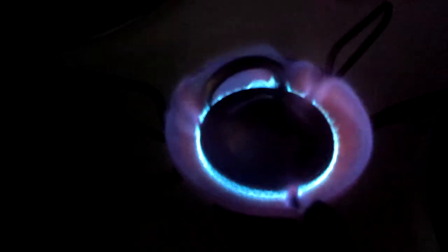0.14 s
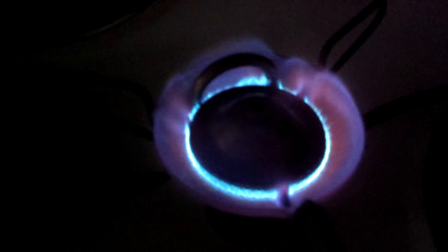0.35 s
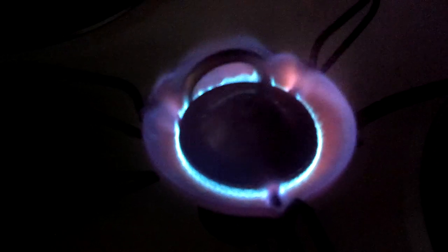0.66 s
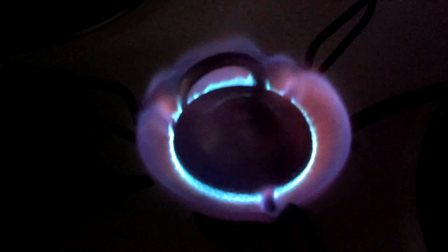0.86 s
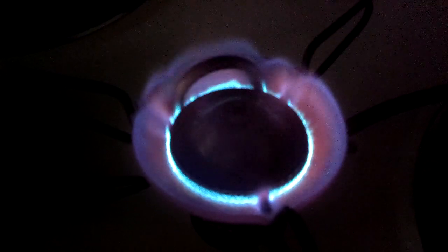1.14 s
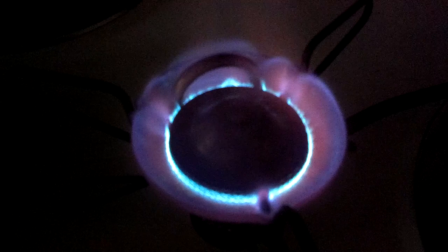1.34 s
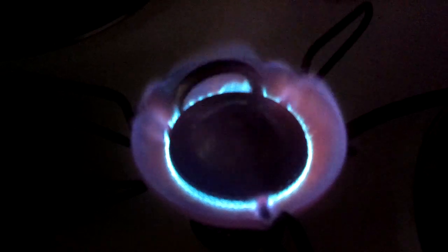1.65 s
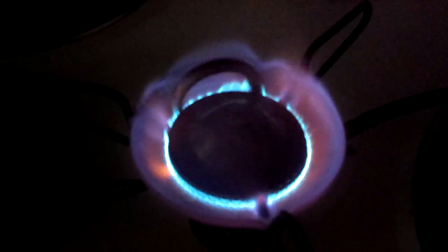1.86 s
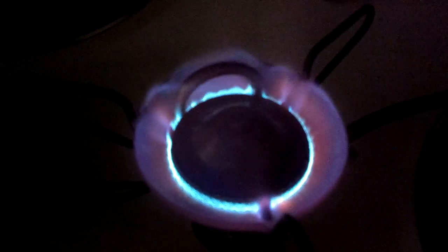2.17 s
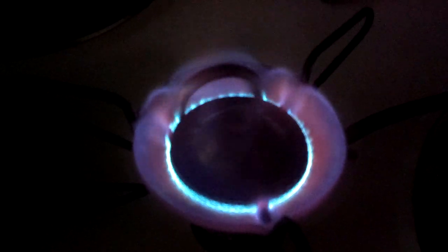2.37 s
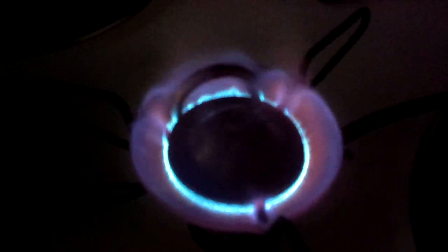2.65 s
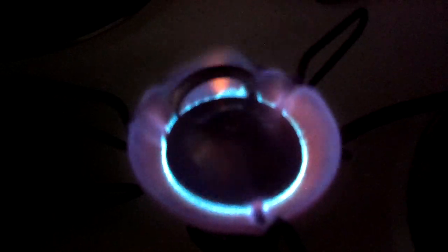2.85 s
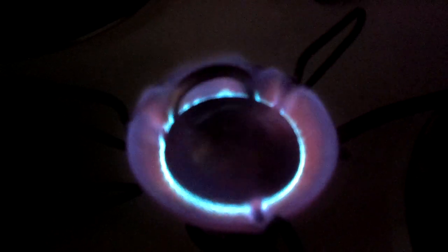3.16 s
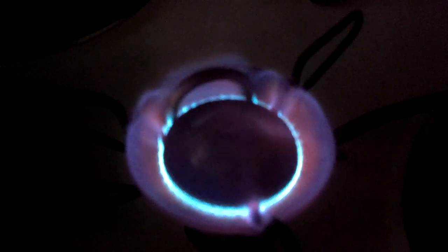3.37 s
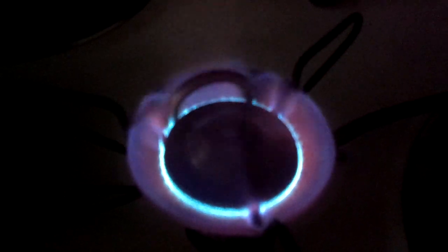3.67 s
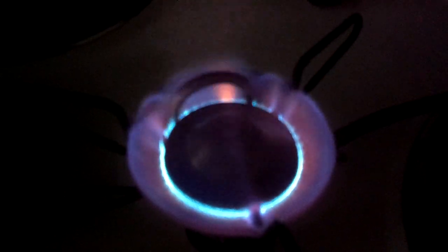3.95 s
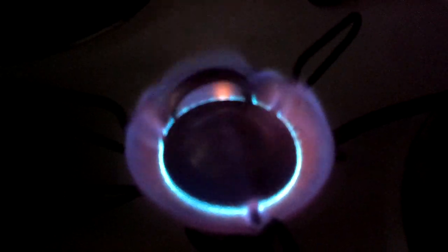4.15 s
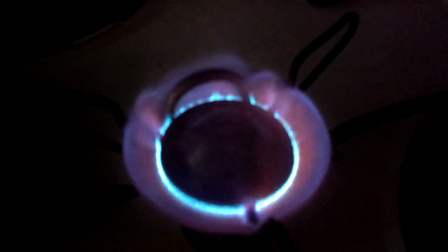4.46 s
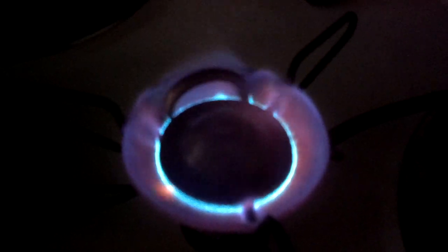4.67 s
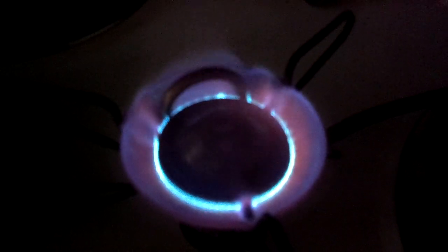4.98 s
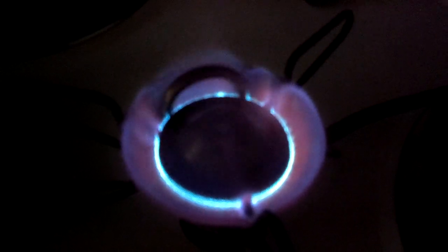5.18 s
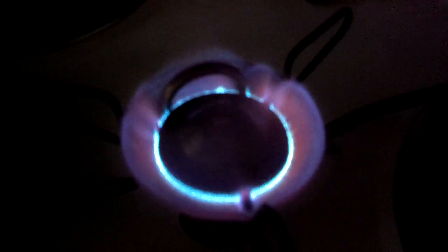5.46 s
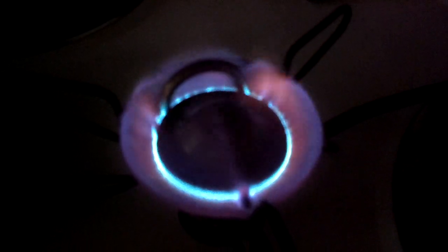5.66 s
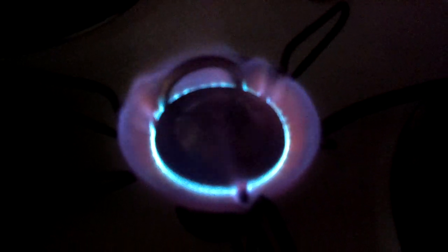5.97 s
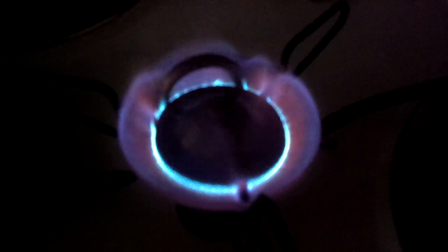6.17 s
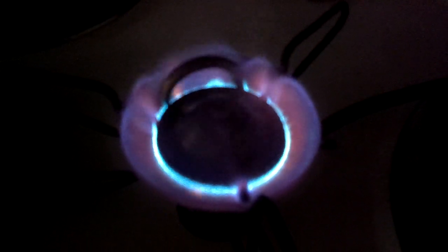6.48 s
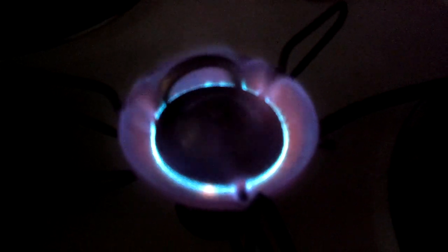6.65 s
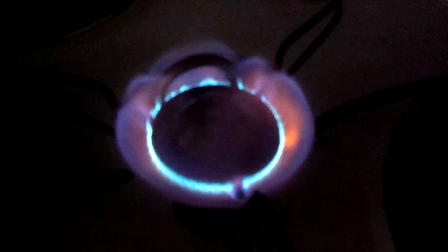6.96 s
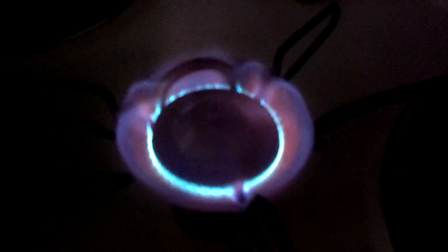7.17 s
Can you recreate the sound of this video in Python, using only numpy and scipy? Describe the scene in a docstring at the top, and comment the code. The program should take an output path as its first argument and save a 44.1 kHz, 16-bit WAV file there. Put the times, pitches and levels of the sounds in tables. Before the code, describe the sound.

A small liquid-fuel camping stove burns close to the microphone in a kitchen. Fuel vapour rushes from the jet with a bright hiss that sputters in quick, uneven spurts, several each second. A thin, high whistle rings within the hiss, and the flame roars low underneath. The burning continues at much the same level throughout, and one short, dull knock comes near the end.

```python
"""A bright hiss, coming in quick spurts: a small liquid-fuel stove burns close by in a kitchen.
Fuel vapour rushes from the jet and rings in the burner, which adds a whistle. Under it the ring of
flame roars low, and one dull knock comes near the end. The right channel hears the hiss upside down
and a little late, so left and right agree at some pitches and oppose each other at others."""
import sys
import numpy as np
from scipy import signal
from scipy.fft import rfft, irfft, next_fast_len
from scipy.io import wavfile
from scipy.ndimage import uniform_filter1d, map_coordinates

SR = 44100
rng = np.random.default_rng(int(sys.argv[2]) if len(sys.argv) > 2 else 0)


def generate_wav(sig):
    """Save sig (samples, or channels by samples) to the path in sys.argv[1] as 16-bit PCM at SR."""
    pcm = np.round(np.clip(np.atleast_2d(sig).T, -1, 1) * 32767).astype(np.int16)
    wavfile.write(sys.argv[1], SR, pcm)


N = 322812
TIME = np.arange(N) / SR


# The left side hears the whistle and the lowest hiss a little louder.
# Each row: pitch in Hz, left over right in dB.
HISS_BALANCE = [(700, 1.5), (1050, 0), (5700, -0.12), (6150, 2), (6700, -0.27)]

def hiss(events):
    """Vapour rushes from the jet as noise, swells with each spurt and rings in the burner."""
    noise = turbulence(lambda hz, s: hiss_swell_db(events, hz, s), patchy_db=1.19, bins=5, frames=8)
    jet = stereo(noise, hiss_colour, curve(HISS_BALANCE), hiss_lead, hiss_likeness)
    return amp(slow_burn_db("hiss", TIME)) * jet


# Clear spurts of boiling fuel. Each row: time of the peak in seconds, rise in dB, length in ms.
CLEAR_SPURTS = [(0.005, 5.5, 60), (0.1, 3.5, 40), (0.205, 4, 30), (0.304, 6, 26), (0.35, 3.5, 22),
                (0.419, 6.5, 24), (0.47, 2, 22), (0.522, 8, 34), (0.659, 6.5, 42), (0.784, 5, 36),
                (0.897, 6.5, 52), (0.978, 5.5, 32), (1.06, 6.5, 32), (1.137, 8.5, 41), (1.228, 6, 44),
                (1.37, 6.5, 120), (1.495, 7.5, 50), (1.616, 7.5, 20), (1.663, 6, 53), (1.8, 5.5, 26),
                (1.897, 5.5, 43), (2.0, 6, 28), (2.103, 5.5, 36), (2.268, 6.5, 46), (2.403, 5.5, 33),
                (2.546, 6, 62), (2.659, 7, 44), (2.85, 6, 50), (2.97, 3, 45), (3.123, 5, 40),
                (3.273, 5.5, 34), (3.362, 6.5, 49), (3.505, 6, 68), (3.667, 6, 32), (3.729, 5, 47),
                (3.851, 4, 44), (4.001, 6, 40), (4.103, 3.5, 22), (4.175, 5, 50), (4.28, 5, 45),
                (4.06, 3.5, 24), (4.315, 3, 22), (4.355, 3, 18), (4.392, 5, 22), (4.44, 3, 30),
                (4.51, 4, 26), (4.55, 4, 24), (4.587, 6.5, 30), (4.652, 5, 18), (4.719, 4, 28),
                (4.805, 4, 42), (4.874, 5, 30), (4.974, 6, 30), (5.05, 2.5, 30), (5.152, 4, 67),
                (5.225, 2.5, 45), (5.322, 7.5, 29), (5.438, 4, 30), (5.513, 4.5, 44), (5.583, 4, 28),
                (5.735, 4.5, 43), (5.842, 6, 50), (5.962, 10, 20), (6.062, 6.5, 35), (6.165, 4.5, 49),
                (6.235, 3.5, 30), (6.297, 8, 36), (6.359, 6.5, 26), (6.427, 6, 54), (6.524, 5.5, 39),
                (6.612, 6.5, 72), (6.745, 6, 59), (6.869, 7, 31), (7.013, 7.5, 34), (7.229, 4.5, 40),
                (7.285, 4, 40)]

def spurts():
    """Fuel boils at the jet: clear spurts, with small random ones in the pauses."""
    per_second, mean_db, spread_db, length_ms = 18, 3, 1.5, 18  # the small spurts
    calm_s = 0.053  # they fade away this near a clear spurt
    jitter, size = rng.random((int(per_second * N / SR), 2)).T
    at = (np.arange(len(jitter)) + jitter) / per_second
    clear = np.array(CLEAR_SPURTS)
    nearest_s = np.min(abs(at[:, None] - clear[:, 0]), axis=1)
    rise_db = (mean_db + spread_db * (2 * size - 1)) * (1 - np.exp(-(nearest_s / calm_s) ** 4))
    small = [at, rise_db, np.full(len(at), length_ms)]
    return np.hstack([clear.T, small])[:, :, None]


def surge_db(events, s):
    """The rise of all spurts added up at times s; each rises faster than it falls."""
    at, rise_db, length_ms = events
    half_lengths = 2000 * (s - at) / length_ms
    steepness = np.where(s < at, 1.16, 0.84)
    return np.sum(rise_db * 0.5 ** (steepness * half_lengths) ** 2, axis=0)


# How spurts lift the hiss. Each row: pitch in Hz, share of the spurt's rise.
SPURT_SHARE = [(500, 0.12), (1500, 0.31), (4000, 0.36), (6200, 0.44), (9000, 0.99), (15000, 0.95)]
# The high sheen of the hiss softens midway. Each row: time in seconds, level over the hiss in dB.
SHEEN_LEVELS = [(0, 1.5), (1.5, 0.8), (2.5, 0), (3.5, -1.6), (4.7, -1.6), (5.6, 0.3), (6.3, 0.5),
                (7.32, -0.5)]

def hiss_swell_db(events, hz, s):
    """Spurts lift the treble most, while the whistle and the sheen drift on their own."""
    whistle_db = bell(hz, centre_hz=6300, width_hz=1400) * slow_burn_db("whistle", s)
    sheen_db = bell(hz, centre_hz=9700, width_hz=2000) * np.interp(s, *zip(*SHEEN_LEVELS))
    return curve(SPURT_SHARE)(hz) * surge_db(events, s) + whistle_db + sheen_db


# The jet's own noise. Each row: pitch in Hz, relative level in dB.
JET_LEVELS = [(650, -3.5), (1100, -4), (1600, -5.5), (2500, -2.5), (3900, 0.0), (5300, -5.5), (7400, -10.5),
              (9200, -7), (10800, -9.5), (12500, -4), (14200, -9), (15700, -3.5)]
# Where the burner's cup and tube ring. Each row: pitch in Hz, width in Hz, level over the jet in dB.
BURNER_RINGS = [(980, 140, 2.9), (1190, 130, 1.9), (1990, 320, 4.0), (2240, 140, 4.2), (2480, 280, 4),
                (2640, 100, 4.9), (3020, 500, 6.6), (3310, 90, 7.5), (3520, 230, 8.5), (3670, 90, 5),
                (3790, 50, 0), (3950, 150, 0), (4065, 35, 1), (4250, 130, 3.1), (4430, 100, 6.3),
                (4600, 180, 7.7), (4830, 350, 4.1), (5080, 150, 4.2), (5240, 80, 3.3), (5710, 230, 11.9),
                (5910, 100, 10.8), (6160, 300, 19.9), (6320, 90, 15), (6480, 130, 11.2), (6750, 650, 9.3),
                (8460, 120, 2), (8630, 840, 8.8), (8690, 200, 5), (9550, 250, 5.4), (10110, 940, 2.1),
                (10530, 70, 3.9), (11140, 230, 5.5), (14730, 630, 4.9), (15360, 450, 1.5)]
# Where close reflections cancel the jet. Each row: pitch in Hz, width in Hz, depth in dB.
REFLECTION_DIPS = [(1095, 90, 2), (1780, 60, 3.5), (2126, 150, 2), (2340, 50, 2.5), (2420, 49, 2.5),
                   (3225, 40, 2), (3755, 40, 3), (4350, 40, 5), (4500, 40, 1.5), (4730, 60, 3),
                   (4975, 70, 2.5), (5180, 60, 4), (5380, 70, 2.5), (5810, 40, 2.5), (5970, 35, 3),
                   (6395, 55, 4), (7360, 60, 1.5), (9100, 80, 2.5), (9300, 60, 3), (9720, 50, 3),
                   (9905, 50, 3), (10800, 250, 3.5), (11540, 60, 4), (12500, 80, 3), (12430, 90, 2.5),
                   (12900, 250, 1.5), (2765, 130, 3.5)]

def hiss_colour(hz):
    """How strong each pitch is: the burner adds peaks to the jet, and reflections cut dips."""
    def peak(centre_hz, width_hz):
        return 1 / (1 + (2 * (hz - centre_hz) / width_hz) ** 2) ** 2

    ring_power = sum(amp(db) ** 2 * peak(pitch, width) for pitch, width, db in BURNER_RINGS)
    dips_db = sum(db * peak(pitch, width) for pitch, width, db in REFLECTION_DIPS)
    jet_db = curve([(300, -30), *JET_LEVELS])(hz)  # very little bass
    return amp(jet_db - dips_db) * np.sqrt(1 + ring_power)


# Bands where left and right agree, then oppose, in turn.
# Each row: low edge in Hz, high edge in Hz, likeness from 0 to 1 in the gap above the band.
STEREO_BANDS = [(1010, 1720, .42), (2412, 2933, 0.68), (3975, 4680, 0.43), (5230, 5580, 0.64),
                (6740, 7530, .2), (7647, 8323, 0.74), (9630, 9890, 0.3), (10770, 11480, .45),
                (12120, 12800, .35), (13350, 14000, .35), (14700, 16000, 1)]

def hiss_lead(hz):
    """The right wave's lead in radians: it starts upside down and slips half a turn per band."""
    edges_hz = np.array(STEREO_BANDS)[:, :2].ravel()
    half_turns = np.repeat(np.arange(len(STEREO_BANDS)), 2)
    return -np.pi * np.interp(hz, [0, *edges_hz], [-1, *half_turns])


def hiss_likeness(hz):
    """Left and right are less alike between the bands, most of all beside a band that agrees."""
    _, high_hz, gap_likeness = np.transpose(STEREO_BANDS)
    gap = np.maximum(np.searchsorted(high_hz, hz) - 1, 0)
    lead = hiss_lead(hz)
    looseness = np.minimum(1, 2 * abs(np.sin(lead))) * abs(np.cos(lead / 2))
    return 1 - (1 - gap_likeness[gap]) * looseness


# The flame's roar. Each row: pitch in Hz, relative level in dB, left over right in dB,
# the right wave's lead in radians, likeness of the two sides from 0 to 1.
FLAME_TONE = [(30.2, -38, 10, 3.4, 1), (55, -22.0, -3, 3.1, 0.97), (79.6, -16, -1.5, 3.16, 0.82),
              (116.8, -2, 1.5, 2.15, 0.93), (132, -1, 3.5, 2.08, 0.93), (150, -3.2, 3.9, 2.52, 0.97),
              (184, -2.6, 1.5, 2.22, 0.99), (225, -1.5, 2.5, 1.73, .96), (250, -1, 2.5, 1.67, .97),
              (277, 0, 4.5, 1.03, 0.93), (295, 0, 5.5, 0.76, .92), (309, -3.5, 12, 0.87, .7),
              (332, -7, 12, 2.05, .75), (363, -6.9, 5.4, 2.14, .9), (390, -7.8, 2.8, 1.9, 0.92),
              (415, -10.7, 7, 1.43, .7), (436, -9.6, 6, 1.23, 0.7), (455, -12, 7, 1.58, .7),
              (490, -8.5, 6.5, 1.65, .88), (510, -10.1, 4, 1.47, .85), (550, -16.5, 6, 1.13, .55),
              (572, -14.5, 2.5, .86, 0.73), (615, -18, 7.5, 1, .2), (646, -27, 3.5, 2.2, 0.6),
              (690, -26, 3, 1.4, .6), (738, -20.5, 4, .6, .9), (765, -28.5, 4, 1, .6),
              (810, -19.5, 3, 0.5, 0.97), (870, -25, 3.5, .5, 0.96)]
# How spurts make the flame flare. Each row: pitch in Hz, share of the spurt's rise.
FLARE_SHARE = [(150, .05), (300, .1), (500, .2), (800, .2)]
# The deepest rumble drifts on its own. Each row: time in seconds, level over the roar in dB.
RUMBLE_LEVELS = [(0, 3), (0.7, -1), (1.4, -0.5), (2.2, 5), (3, 3), (3.8, 1.5), (4.5, -1), (5, -1.5),
                 (5.7, 1), (6.5, -2), (7.32, 0)]

def roar(events):
    """The ring of flame roars, louder on the left; it throbs, and flares just after each spurt."""
    flare_lag_s, rumble_top_hz, throbs_per_s, throb_db = 0.022, 92, 13, 1.8
    level_db, balance_db, lead, likeness = [curve(FLAME_TONE, column) for column in (1, 2, 3, 4)]
    flare_db = lambda hz, s: curve(FLARE_SHARE)(hz) * surge_db(events, s - flare_lag_s)
    noise = turbulence(flare_db, patchy_db=0.8, bins=2, frames=16)
    colour = lambda hz: amp(level_db(hz)) * low_pass(hz, 1000)
    flame = stereo(noise, colour, balance_db, lead, likeness)
    rumble = filtered(flame, lambda hz: low_pass(hz, rumble_top_hz))
    drift = (amp(np.interp(TIME, *zip(*RUMBLE_LEVELS))) - 1) * rumble
    core = filtered(flame, lambda hz: bell(hz, centre_hz=280, width_hz=120, steepness=4))
    random_steps = rng.standard_normal(int(N / SR * throbs_per_s) + 4)
    throb = unit(map_coordinates(random_steps, [TIME * throbs_per_s]))  # glides from step to step
    puffs = (unit(amp(throb_db * throb)) - 1) * core
    return amp(slow_burn_db("roar", TIME)) * (flame + puffs + drift)


# How strongly the stove burns.
# Each row: time in seconds, roar level in dB, hiss level in dB, whistle over the hiss in dB.
BURN_LEVELS = [(0.0, -40, -40, -2), (0.47, -45.5, -41, 0.5), (1.14, -43.5, -42, -0.5),
               (2.14, -44.5, -41, 0), (3.1, -44.5, -41.5, -1.5), (3.6, -43, -41, -1),
               (4.73, -42.5, -41.5, 1), (5.81, -43.5, -41.5, 0), (6.48, -43, -42, -0.5),
               (6.79, -45, -42, -2), (7.32, -44, -41.5, -3.5)]

def slow_burn_db(part, s):
    """The slowly wandering level of the roar, hiss or whistle at times s."""
    at, *levels = np.transpose(BURN_LEVELS)
    return np.interp(s, at, levels[["roar", "hiss", "whistle"].index(part)])


# The tones of the knock. Each row: pitch in Hz, seconds to fade by 60 dB,
# left and right level in dB relative to the knock, left and right delay in ms.
KNOCK_TONES = [(163, .06, -2.5, -1.5, 5.7, 2.5), (308, .018, 1.5, 1.5, 1.95, 3.0),
               (520, .02, -4, -3, 2.2, 3.1), (920, .016, -3.5, -4, 0.97, 0.15),
               (1380, 0.015, -7, -5.5, 0.95, 0.35), (1850, .012, -18, -15, 0.57, 0.39)]

def knock(start_s, level_db):
    """A soft blow sets a few short tones ringing; the low ones last longest."""
    tones = np.zeros((2, N))
    for pitch, fade_s, left_db, right_db, left_ms, right_ms in KNOCK_TONES:
        age = np.maximum(TIME - start_s - np.array([[left_ms], [right_ms]]) / 1000, 0)
        rise = 1 - np.exp(-age * pitch / 0.18)  # low tones build up more slowly
        fade = amp(level_db + np.array([[left_db], [right_db]]) - 60 * age / fade_s)
        tones -= rise * fade * np.sin(2 * np.pi * pitch * age)
    # no deep thud, no sharp edge
    return filtered(tones, lambda hz: hz ** 4 / (125 ** 4 + hz ** 4) * low_pass(hz, 2200))


def turbulence(swell_db, patchy_db, bins, frames):
    """Two noises that swell together, with random patches `bins` wide in pitch and `frames` long."""
    hz, s, spectra = signal.stft(rng.standard_normal((2, N)), SR, nperseg=256)
    patches = uniform_filter1d(rng.standard_normal(spectra.shape[1:]), size=bins, axis=0)
    patches = uniform_filter1d(patches, size=frames, axis=1)
    gain = amp(swell_db(hz[:, None], s) + patchy_db * unit(patches))
    return signal.istft(spectra * gain, SR, nperseg=256)[1][:, :N]


def stereo(noises, colour, balance_db, lead, likeness):
    """Left takes the first noise; right takes it with its waves shifted, blended with the second."""
    def mix(hz):
        same = np.clip(likeness(hz), 0, 1)
        left_gain = amp(balance_db(hz) / 2)
        right_gain = np.exp(1j * lead(hz)) / left_gain
        return colour(hz) * np.array([left_gain, same * right_gain, np.sqrt(1 - same ** 2) * right_gain])

    left, right_shared, right_own = filtered(noises[[0, 0, 1]], mix)
    return unit(np.array([left, right_shared + right_own]))


def amp(db):
    """Turns dB into a number to multiply by."""
    return 10 ** (np.asarray(db) / 20)


def unit(x):
    """Scales x to an average (rms) level of 1."""
    return x / np.sqrt(np.mean(x ** 2) + 1e-20)


def curve(rows, column=1):
    """Joins a table's points into a function of pitch, with octaves evenly spaced."""
    columns = np.transpose(rows)
    return lambda hz: np.interp(np.log(hz + 1), np.log(columns[0] + 1), columns[column])


def bell(hz, centre_hz, width_hz, steepness=2):
    """A smooth hump around one pitch."""
    return np.exp(-(2 * (hz - centre_hz) / width_hz) ** steepness)


def low_pass(hz, top_hz):
    """Lets the pitches below top_hz through."""
    return 1 / (1 + (hz / top_hz) ** 8)


def filtered(x, response):
    """Multiplies each pitch in x by response(hz)."""
    size = next_fast_len(N + 8192)
    return irfft(rfft(x, size) * response(np.fft.rfftfreq(size, 1 / SR)), size)[..., :N]


def scene():
    """The same spurts drive the jet and the flame; one knock comes near the end."""
    events = spurts()
    return hiss(events) + roar(events) + knock(start_s=6.99065, level_db=-23.3)


def record(dry):
    """Cuts away the very highest treble."""
    return filtered(dry, lambda hz: hz < 15750)


dry = scene()
out = record(dry)
generate_wav(out)
```